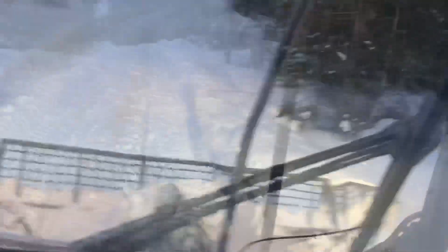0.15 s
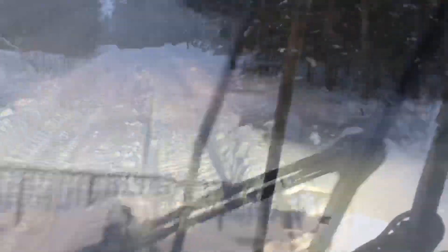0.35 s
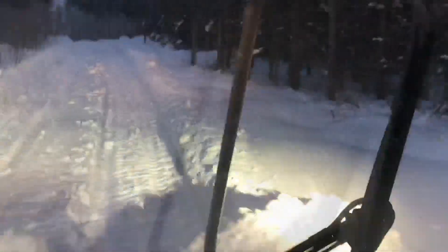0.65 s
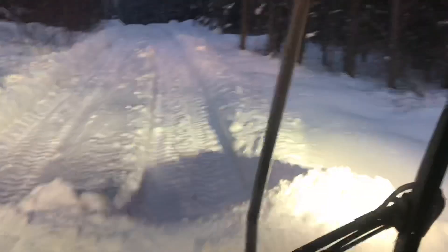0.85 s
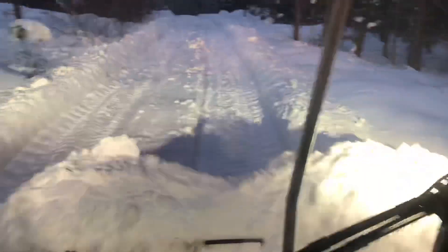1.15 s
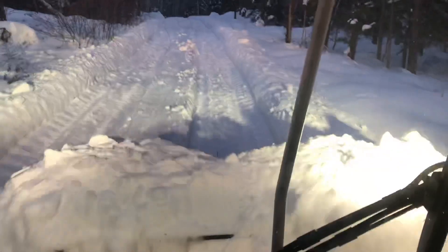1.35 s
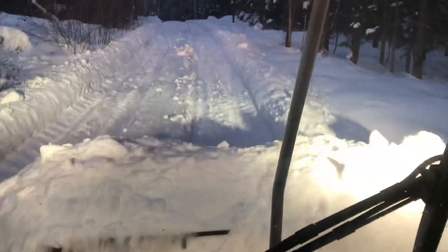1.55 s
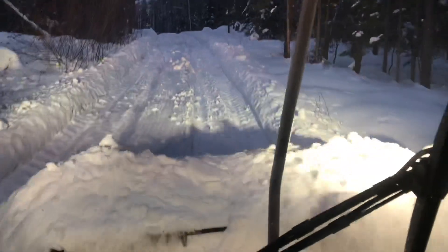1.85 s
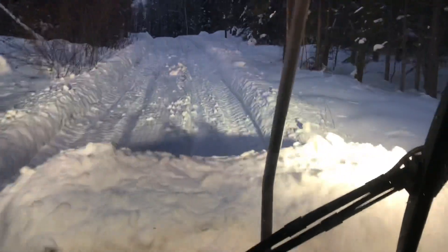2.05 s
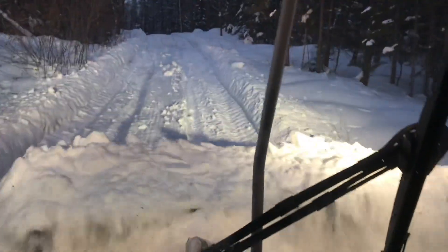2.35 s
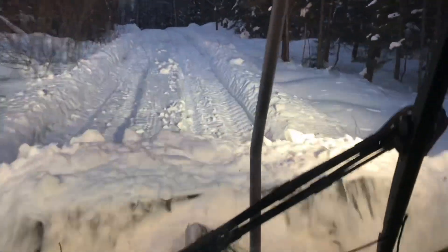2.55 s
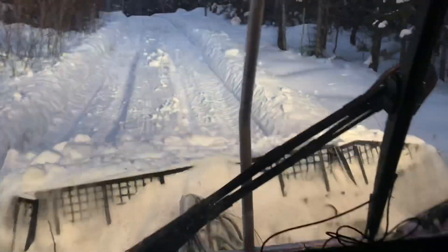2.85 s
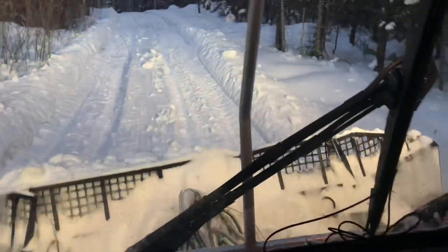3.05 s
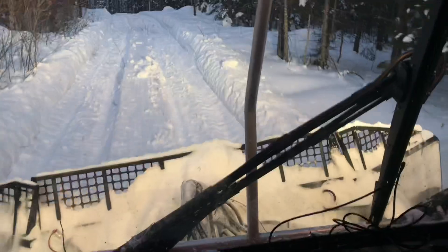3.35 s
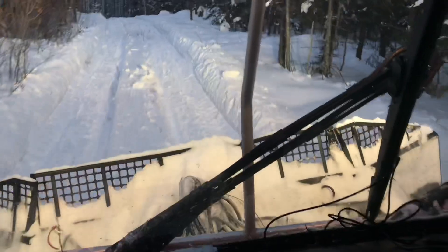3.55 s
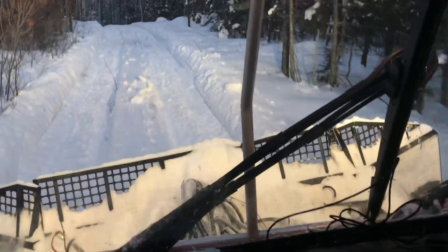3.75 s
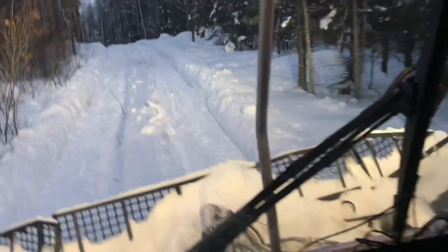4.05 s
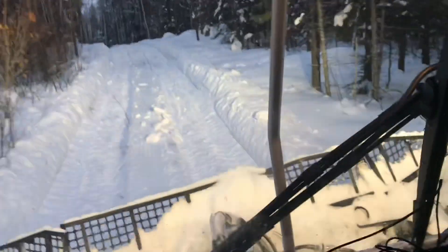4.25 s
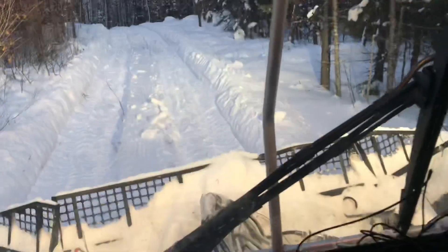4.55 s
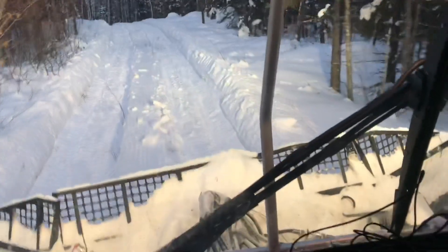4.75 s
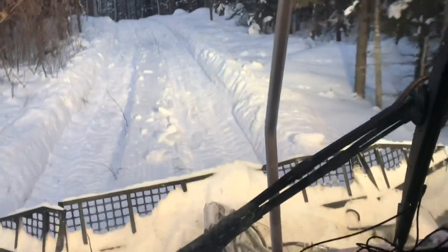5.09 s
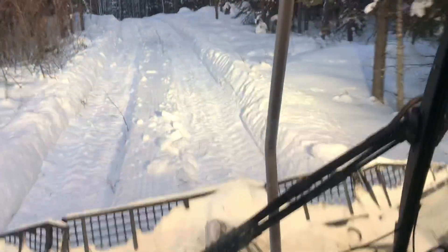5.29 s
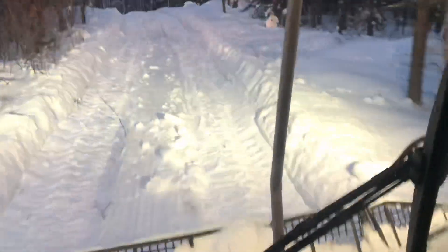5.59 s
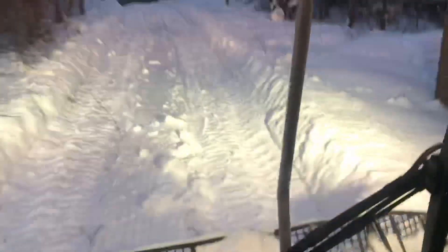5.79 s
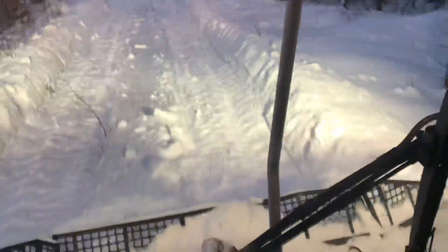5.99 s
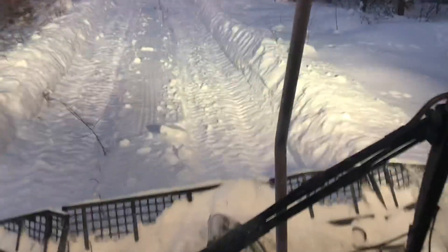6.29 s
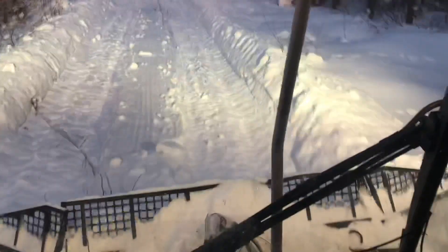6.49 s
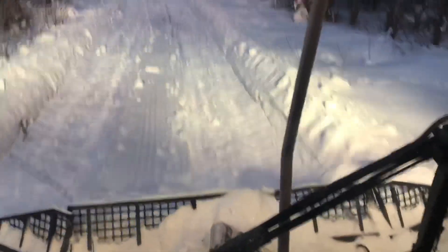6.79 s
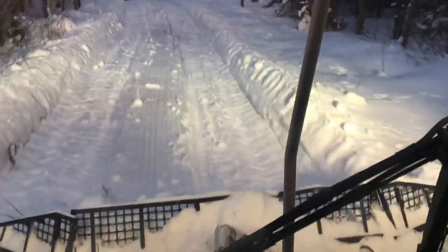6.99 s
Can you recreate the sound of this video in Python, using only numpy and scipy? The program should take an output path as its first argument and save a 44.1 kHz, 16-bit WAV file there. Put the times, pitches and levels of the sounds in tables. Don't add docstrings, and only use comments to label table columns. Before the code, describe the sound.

A heavy diesel drones through a cab while track motors whine up and down, cleats throb, and late ice knocks rattle loose fittings.

```python
import sys
import numpy as np
from scipy import signal
from scipy.io import wavfile
from scipy.ndimage import uniform_filter1d

SR = 44100
rng = np.random.default_rng(int(sys.argv[2]) if len(sys.argv) > 2 else 0)


def master_out(mix):
    frames = np.transpose(np.atleast_2d(mix))
    ceiling = np.clip(frames, -1, 1)
    pcm = np.round(ceiling * 32767).astype(np.int16)
    wavfile.write(sys.argv[1], SR, pcm)


def boost(x):
    u = np.asarray(x, float) / 20
    return 10 ** u


N = 314425

# t/s, firing rate f/Hz, fuel effort level/dB, oil pressure level/dB
ENGINE = [(0, 51.46, -9, -21), (.3, 50.8, -2.5, -3.5), (.6, 52.63, -1.5, -4.5), (.88, 53.16, -6.5, -5),
          (1.1, 52.27, 0.5, 0), (1.9, 52.44, -1, 1), (2.4, 55.04, 0, -1.5), (2.85, 54.39, -0.5, -2),
          (3.3, 55.98, 1.5, 0.5), (3.75, 56.33, 0.5, -1), (4.1, 55.14, -5.5, -11), (4.4, 54.4, 1, -3),
          (4.8, 53.24, -1.5, -4.5), (5.25, 53.95, -2, -2), (5.65, 55.7, -4, 1.5), (6.0, 54.97, -4.5, -12),
          (6.4, 52.4, -4, -2.5), (7.13, 53.94, 2, -3.5)]
STRONG_ORDERS = (1, 2, 2.75, 4)
# level/dB, share of effort/(dB/dB), boom f/Hz, boom width/Hz, waver/dB
STRONG_BOOMS = [
    (-22.5, 1.13, 52.9, 2.16, 1.5),
    (-31, 0.36, 106.8, 9.2, 1.5),
    (-29.5, 0.15, 152.5, 3.8, 0.8),
    (-31, 1.05, 220.2, 30.5, 0.5),
]
# multiple of firing rate, level/dB
WEAK_ORDERS = [(1.6, -39.5), (2.5, -58), (3, -44), (3.25, -40.5), (5.4, -49.5), (7, -53.5), (8, -54),
               (9.5, -60), (13.8, -60), (18.25, -64.5), (18.75, -62.5)]
# centre t/s, length/s, depth/dB
LIFTS = [
    (0.152, .2, -8),
    (4.126, 0.37, -12),
    (5.691, 0.12, -7.5),
    (6.003, 0.24, -13),
]
PUMP_ORDERS = (6.4, 12.8, 9.74)
# level/dB, share of drive/(dB/dB), boom f/Hz, boom width/Hz, waver/dB
PUMP_BOOMS = [
    (-32, 1.4, 339, 13.6, 0.83),
    (-44, 1.11, 608, 240, 0.96),
    (-45.5, -0.075, 558, 86, 1.4),
]
# t/s, level/dB
VALVE = [(0, -5), (.45, 3), (.7, -1.5), (.83, -13), (.97, 5), (1.5, -1.5), (2.05, -5), (2.3, 2),
         (2.9, -3.5), (3.92, 0.5), (4.12, -9), (5.3, -6), (5.55, -1), (6, -10), (6.4, -2), (7.13, -12)]
# t/s, f/Hz, level/dB
WHINE_A_ROWS = [(.2, 236.7, -48), (.6, 257.8, -31.5), (.95, 261, -28.5), (1.3, 269, -35.5),
                (1.8, 253.3, -26.5), (2.15, 266.7, -32), (2.7, 306.4, -43), (3.2, 332, -35.5),
                (3.7, 332.5, -49)]
# t/s, f/Hz, level/dB
WHINE_B_ROWS = [(4.05, 290, -55), (4.2, 276, -39.5), (4.4, 272, -36.5), (4.65, 281, -37), (4.85, 300, -42),
                (5.1, 329, -50), (5.3, 337, -36.5), (5.6, 332, -61)]
# t/s, rate f/Hz, level/dB
CLEATS = [(0, 33.75, -57), (.81, 37.5, -27.5), (1.05, 38.76, -38), (1.35, 45.8, -24), (1.9, 38.51, -46),
          (2.16, 36.3, -25.5), (2.52, 37.6, -22), (3.15, 47.65, -31.5), (3.61, 47.34, -31),
          (4.13, 42.3, -31), (4.48, 36.3, -26.5), (4.77, 38.56, -25.5), (5.15, 47.62, -23),
          (5.44, 44.66, -25), (5.64, 43.4, -33), (5.9, 42.45, -28.5), (6.35, 37.57, -27.5),
          (7.13, 41.1, -32)]
# t/s, f/Hz, level/dB
TURBO = [(0, 13950, -65), (.22, 13200, -71), (.5, 11550, -75), (.68, 11860, -67), (1.5, 13520, -65),
         (2, 14100, -60), (2.45, 14580, -64), (3.6, 14920, -63), (3.85, 14740, -60), (4.25, 13240, -68),
         (4.5, 13130, -68), (4.9, 13510, -68), (5.25, 14060, -62), (5.57, 14120, -63), (6.05, 12470, -69),
         (6.3, 12120, -67), (6.6, 12400, -66), (7.13, 13450, -64)]
# t/s, ring f/Hz, ring level/dB, crackle level/dB, panel knock level/dB
KNOCKS = [(.0648, 3450, -56, -52, -45), (.335, 5860, -54, -53, -50), (2.137, 9910, -59, -48.5, -39),
          (2.29, 11880, -55, -43, -41), (2.549, 2880, -44, -60, -56), (3.9417, 4600, -58, -46, -43),
          (4.2447, 6025, -46.5, -56, -45), (4.661, 2329, -52, -59, -34.5), (5.105, 2799, -53, -48, -45),
          (5.6436, 8387, -60, -42.5, -37), (5.721, 4840, -44, -41.5, -35.5), (5.796, 2350, -50, -57, -40),
          (5.884, 11280, -58, -56, -44), (6.063, 4114, -38, -39, -28), (6.0826, 3338, -41, -46, -35),
          (6.1, 2315, -52, -57, -33.5), (6.153, 6340, -55, -50, -53), (6.593, 6326, -43, -39, -43)]
# t/s, ring f/Hz, ring level/dB, crackle level/dB
TICKS = [(.224, 9910, -61, -56), (2.168, 5900, -55, -51), (2.54, 5700, -58, -58), (4.189, 2300, -49, -60),
         (3.346, 5176, -62, -50), (5.752, 8200, -54, -50), (5.751, 3200, -49, -60), (5.776, 3200, -46, -58),
         (5.774, 6575, -62, -45), (5.87, 8020, -57, -62), (5.898, 10680, -62, -58),
         (5.919, 10750, -60, -61), (5.975, 5440, -55, -56), (6.026, 5560, -57, -58),
         (6.279, 3390, -52, -57), (6.594, 3100, -37.5, -58), (6.603, 3900, -46, -54),
         (6.053, 3600, -50, -54), (6.067, 9700, -50, -47), (6.139, 8536, -58, -51), (7.086, 7554, -58, -55)]
# t/s, length/s, level/dB, centre f/Hz
RATTLES = [
    (2.289, .026, -51.5, 7000),
    (2.545, 0.035, -54, 2870),
    (3.94, 0.026, -48, 2605),
    (4.655, 0.041, -45, 1510),
    (5.719, 0.11, -51.5, 2596),
    (6.058, 0.059, -39.5, 1720),
    (6.593, 0.041, -47, 3900),
]
# t/s, length/s, f/Hz, level/dB
THUDS = [
    (0, 0.095, 81.7, -22.5),
    (.02, 0.092, 198.5, -31.5),
    (4.0, 0.15, 107.8, -28),
    (5.85, 0.098, 168.1, -25),
]
# t/s, drone and hiss level/dB, rumble level/dB
ROAR = [(0, -2.5, -2), (.07, -3, -0.5), (.2, -5, -3), (.45, -3.5, -4), (.75, -1, -2.5), (1.05, -0.8, -6),
        (1.4, -0.7, 1), (1.75, 0, -3), (2.8, -0.2, -0.1), (3.5, .8, 1), (4.45, -0.5, -2.5),
        (4.8, -0.8, 0.4), (5.8, -.3, 0.5), (6.1, 0.8, -2.5), (6.35, -.7, 0.3), (7.13, -0.5, 0.7)]
# f/Hz, level/(dB per Hz)
CAB = [(12, -40), (20, -3), (54, -2), (151, -6), (221, -9), (270, -14.5), (341, -14.5), (394, -24.5),
       (517, -23.5), (826, -31), (1010, -26.5), (1500, -36.5), (1950, -35), (3300, -120)]
# f/Hz, level/(dB per Hz)
HISS = [(1300, 1), (1600, 0), (2600, -4), (3300, -7), (4600, -12.5), (4950, -16.5), (6150, -15.5),
        (6600, -18), (7700, -21.5), (9200, -21), (10500, -27.5), (11300, -24), (13500, -25.5), (15700, -26)]
# from t/s, to t/s, share of frames
DROPOUTS = [
    (0, .08, .4),
    (1.5, 1.72, .2),
    (1.72, 2.15, .6),
    (2.15, 2.45, .2),
    (2.45, 3.98, .85),
    (5.13, 5.62, .75),
]


def evened(x):
    return x / np.sqrt(np.mean(x ** 2) + 1e-20)


def curves(rows):
    s, *columns = np.transpose(rows)
    return [np.interp(np.arange(N) / SR, s, c) for c in columns]


def drift(rate_hz):
    hz = np.geomspace(rate_hz / 8, rate_hz, 12)[:, None]
    t = np.arange(0, N + 200, 200) / SR
    sines = np.sin(2 * np.pi * (hz * t + rng.random(hz.shape)))
    slow = (sines / np.sqrt(hz)).sum(0)
    return np.interp(np.arange(N) / SR, t, evened(slow))


def tone(hz, db, waver_db=0.9, waver_turns=0.015):
    turns = np.cumsum(hz * np.ones(N)) / SR + rng.random() + waver_turns * drift(14)
    return np.sqrt(2) * boost(db + waver_db * drift(12)) * np.sin(2 * np.pi * turns)


def boomed(hz, drive_db, db, share, boom_hz, width_hz, waver_db):
    detune_db = 10 * np.log10(1 + (2 * (hz - boom_hz) / width_hz) ** 2)
    return tone(hz, db + share * drive_db - detune_db, waver_db=waver_db)


def resonate(x, hz, width_hz):
    turn = np.exp(2j * np.pi * np.cumsum(hz * np.ones(len(x))) / SR)
    r = np.exp(-np.pi * width_hz / SR)
    return 2 * (turn * signal.lfilter([1 - r], [1, -r], x / turn)).real


def rung(x, hz, width_hz):
    return evened(resonate(resonate(x, hz, width_hz), hz, width_hz))


def firing_gate(fall_turns):
    turns = np.cumsum(curves(ENGINE)[0]) / SR
    cylinder_db = np.array([0., -2.5, -1.2, -3.5])
    return boost(cylinder_db[turns.astype(int) % 4]) * np.exp(-(turns % 1) / fall_turns)


def lifted():
    t = np.arange(N) / SR
    return sum(db * np.exp(-(2 * (t - s) / length_s) ** 2) for s, length_s, db in LIFTS)


def engine():
    hz, effort_db, _ = curves(ENGINE)
    effort_db = effort_db + lifted()
    strong = sum(boomed(k * hz, effort_db, *row) for k, row in zip(STRONG_ORDERS, STRONG_BOOMS))
    weak = sum(tone(k * hz, db, waver_db=2.5) for k, db in WEAK_ORDERS)
    slack_gear = tone(14.95 * hz, -59 - 0.37 * effort_db)
    return strong + slack_gear + weak


def pumps():
    hz, _, oil_db = curves(ENGINE)
    oil_db = oil_db + 1.5 * lifted()
    drives_db = oil_db, curves(VALVE)[0], oil_db
    geared = sum(boomed(k * hz, db, *row) for k, db, row in zip(PUMP_ORDERS, drives_db, PUMP_BOOMS))
    fan = tone(468.7, -47.5, waver_db=0.0)
    return geared + fan


def tracks():
    cleat_hz, cleat_db = curves(CLEATS)
    out = tone(cleat_hz, cleat_db, waver_db=-1.0)
    out += boomed(2 * cleat_hz, cleat_db + 27, -31.5, 0.3, 86, 9.4, waver_db=2.0)
    out += tone(cleat_hz / 2, -51, waver_db=1)
    for rows in (WHINE_A_ROWS, WHINE_B_ROWS):
        hz, db = curves(rows)
        start_s, end_s = rows[0][0], rows[-1][0]
        on = np.interp(np.arange(N) / SR, [start_s, start_s + 0.22, end_s - 0.1, end_s], [0, 1, 1, 0])
        whine = tone(hz, db, waver_db=2.0, waver_turns=0.037)
        fifth = tone(1.5 * hz, db - 14.5, waver_db=1.5)
        out += on * (whine + fifth)
    return out


def turbo():
    hz, db = curves(TURBO)
    hz = uniform_filter1d(hz, size=5000, mode="nearest")
    air = rng.standard_normal(N) * (1 + 0.6 * firing_gate(0.4))
    return boost(db + 0.79 * drift(10)) * rung(air, hz, 280)


def panel_knock(t):
    modes = ((1128, 1, 0.0045), (1380, 4.5, 0.0019), (2050, -10.0, 0.0027), (2605, -15.0, 0.0077))  # Hz, dB, s
    return sum(boost(db) * np.sin(2 * np.pi * hz * t) * np.exp(-t / fall_s) for hz, db, fall_s in modes)


def crackle(noise, grit, hz, t):
    fall = np.exp(-t / 0.011)
    colour = signal.butter(2, [1800, min(1.01 * hz, 15000)], "band", fs=SR, output="sos")
    grains = grit * boost(3.2 * evened(uniform_filter1d(noise, size=50)))
    tail = evened(signal.sosfilt(colour, grains)) * (fall + 0.12 * fall ** 0.3)
    return tail + 0.52 * noise * np.exp(-t / 0.0055)


def ticks():
    out, t = np.zeros(N + 3000), np.arange(3000) / SR
    rows = KNOCKS + [(*row, -np.inf) for row in TICKS]
    noises = rng.standard_normal((len(rows), 2, 3000))
    rise = np.minimum(t / 0.0022, 1)
    knock = panel_knock(t)
    for (s, hz, ring_db, crackle_db, knock_db), (noise, grit) in zip(rows, noises):
        ring = rung(noise, hz, 1300) * np.exp(-t / 0.0046)
        hit = boost(knock_db + 8.5) * knock + boost(ring_db + 7.0) * ring
        hit += boost(crackle_db + 0.2) * crackle(noise, grit, hz, t)
        at = round(s * SR)
        out[at:at + 3000] += rise * hit
    return out[:N]


def rattles():
    out = np.zeros(N)
    noises = rng.standard_normal((len(RATTLES), 2, 5000))
    for (s, length_s, db, hz), (noise, grit) in zip(RATTLES, noises):
        size = round(length_s * SR)
        grains = noise * boost(4.6 * evened(uniform_filter1d(grit, size=60)))
        clatter = rung(grains, hz, 0.94 * hz)[:size]
        out[round(s * SR):][:size] += boost(db) * clatter * np.hanning(size) ** 0.46
    for s, length_s, hz, db in THUDS:
        t = np.arange(round(length_s * SR)) / SR
        out[round(s * SR):][:len(t)] += boost(db + 3.5) * np.sin(2 * np.pi * hz * t) * np.hanning(len(t))
    return out


def roar():
    frames, hz = N // 512 + 5, np.fft.rfftfreq(2048, 1 / SR)
    a, b, patches = rng.standard_normal((frames, 1025, 3)).T
    patches = uniform_filter1d(patches, size=14, axis=0)
    patches = evened(uniform_filter1d(patches, size=8, axis=1))
    z = (a + 1j * b) * boost(0.96 * patches)
    cab, hiss = (boost(np.interp(np.log(hz + 1), np.log(f), db))
                 for f, db in (np.transpose(CAB), np.transpose(HISS)))
    low = 1 / (1 + (hz / 330) ** 6)
    high = 1 / (1 + (1400 / (hz + 1)) ** 8)
    upper_db, rumble_db = curves(ROAR)
    bands = [(low * cab, -25 + rumble_db, -1.5, 0.1),
             ((1 - low - high) * cab, -37.5 + 0.98 * upper_db, -1.5, 0.3),
             (high * hiss, -49 + upper_db, 0.3, 0.45)]
    out, gate = 0, firing_gate(0.44)
    for colour, level_db, trim_db, knock in bands:
        band = signal.istft(z * colour[:, None], nperseg=2048, noverlap=1536)[1][:N]
        out = out + boost(level_db + trim_db) * evened(band * (1 + knock * gate))
    return out


def scene():
    return (engine() + pumps() + tracks() + turbo() + ticks() + rattles() + roar())[None]


def band_limit(x):
    return signal.sosfilt(signal.butter(12, 15980, fs=SR, output="sos"), x)


def record(dry):
    cut = signal.sosfilt(signal.butter(4, 18, "high", fs=SR, output="sos"), dry)
    padded = np.pad(cut, ((0, 0), (0, 4096)), "reflect")
    hz, t, z = signal.stft(padded, SR, nperseg=2048, boundary="even")
    share = sum(part * ((t > start) & (t < end)) for start, end, part in DROPOUTS)
    whistle_hz = np.interp(t, *np.transpose(TURBO)[:2])
    band = np.arange(len(hz)) // 16
    chance = rng.random((len(t), 1)) * 0.6 + rng.random((len(t), band[-1] + 1)) * 0.4
    above = hz[band * 16][:, None] > whistle_hz + 300
    dropped = (chance.T[band] < share) & above
    kept = (hz[:, None] < 15760) & ~dropped
    limited = signal.istft(z * kept, SR, nperseg=2048)[1][:, :N]
    return band_limit(limited)


dry = scene()
out = record(dry)
master_out(out)
```